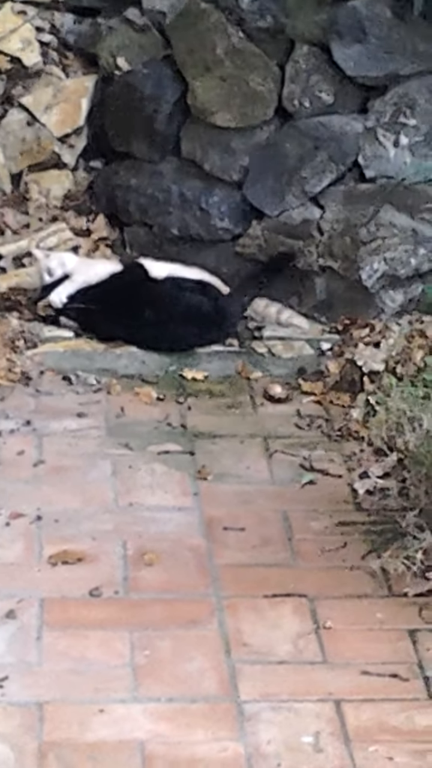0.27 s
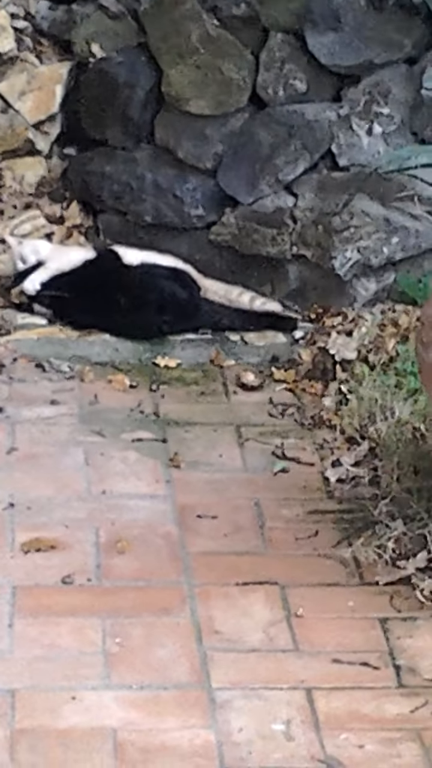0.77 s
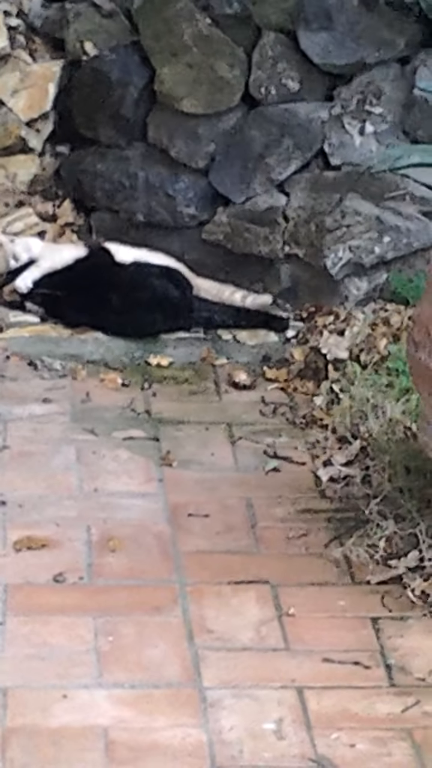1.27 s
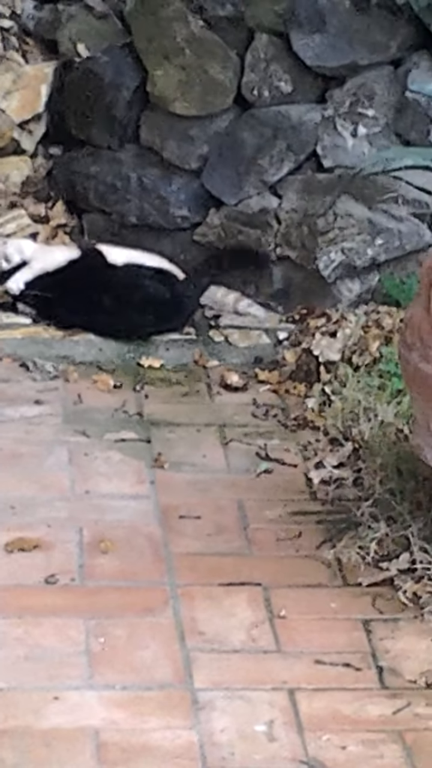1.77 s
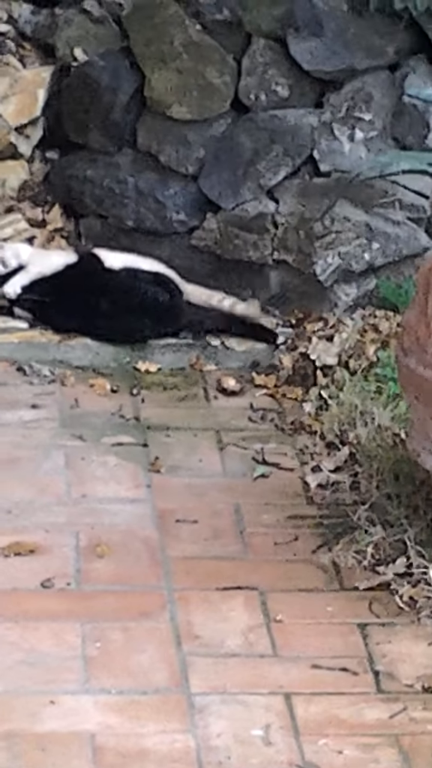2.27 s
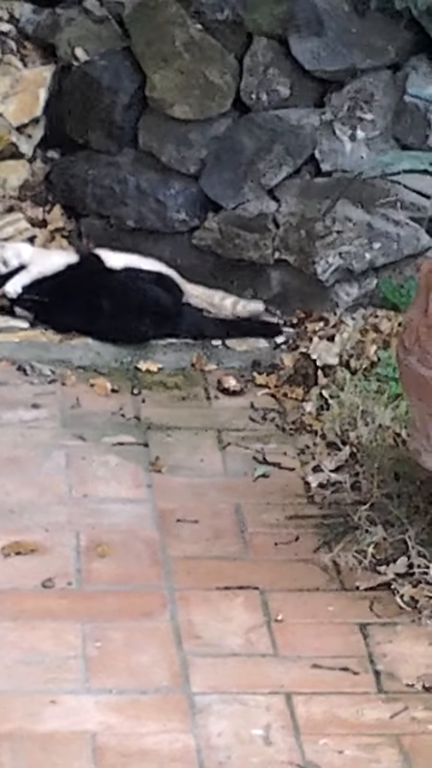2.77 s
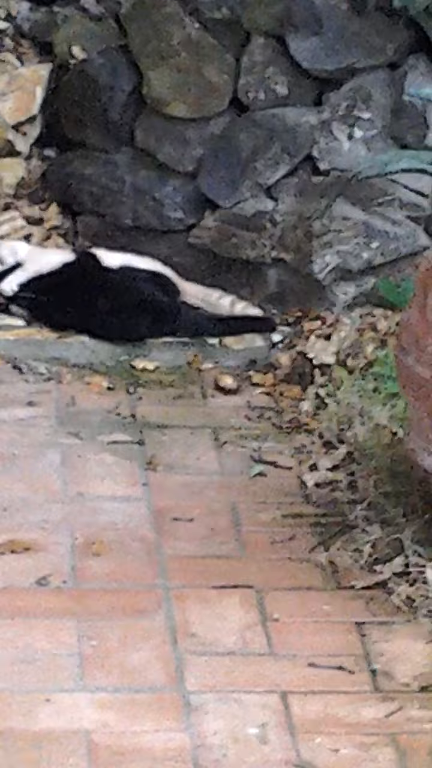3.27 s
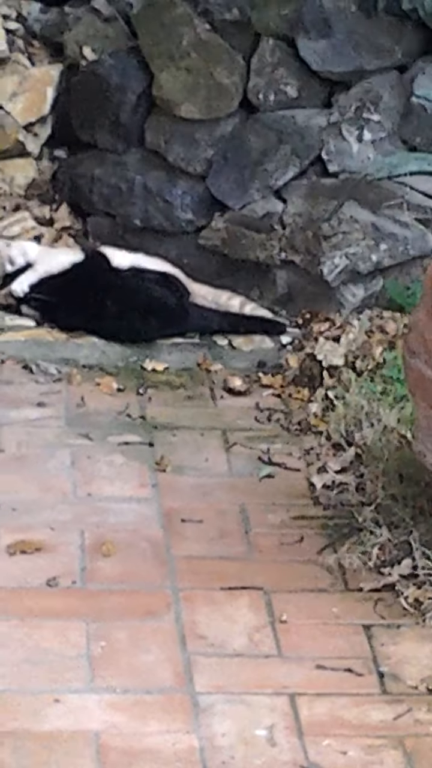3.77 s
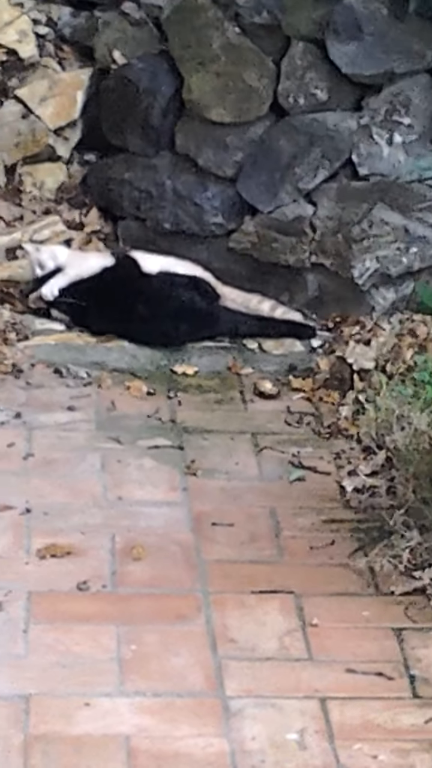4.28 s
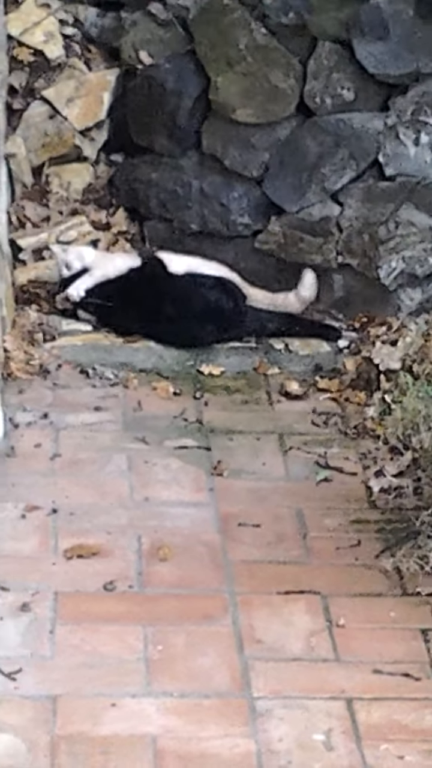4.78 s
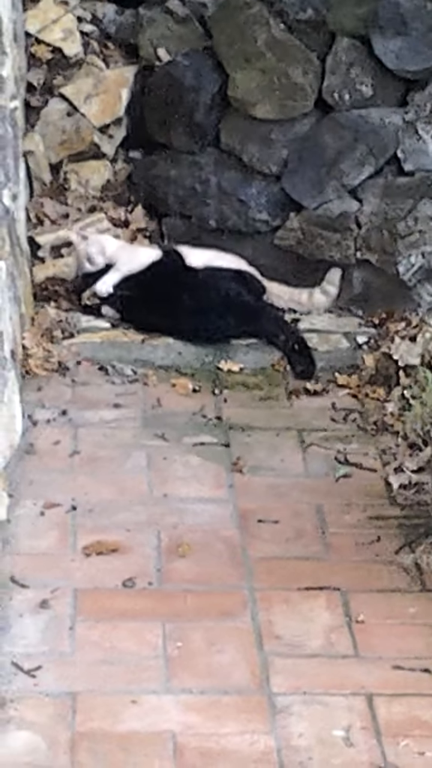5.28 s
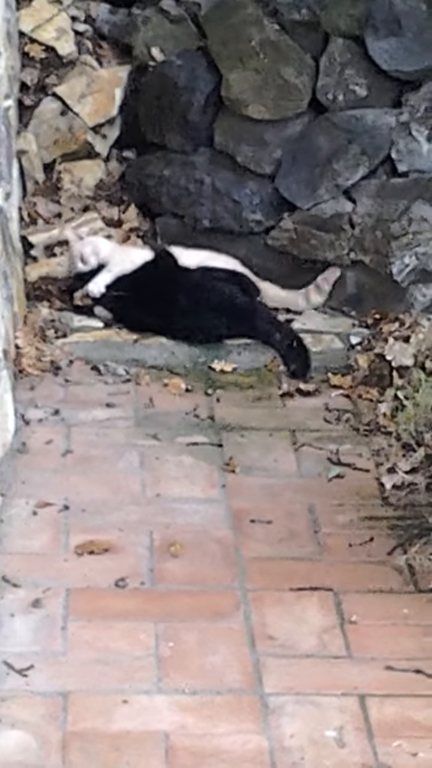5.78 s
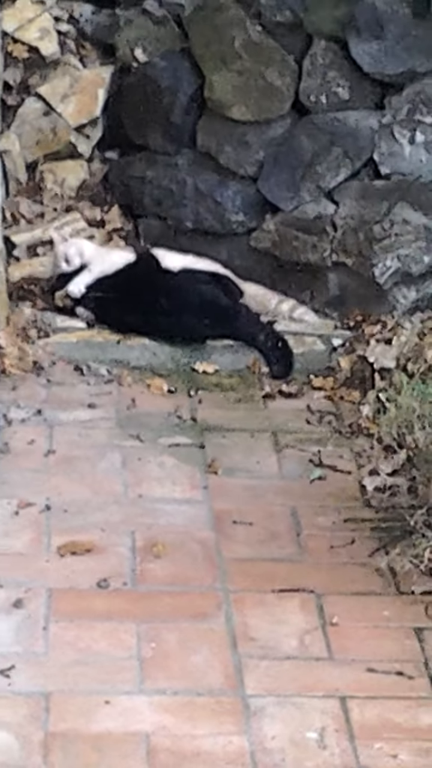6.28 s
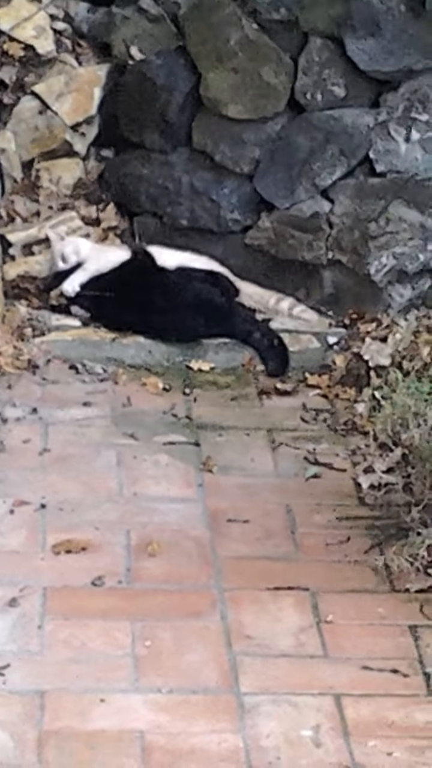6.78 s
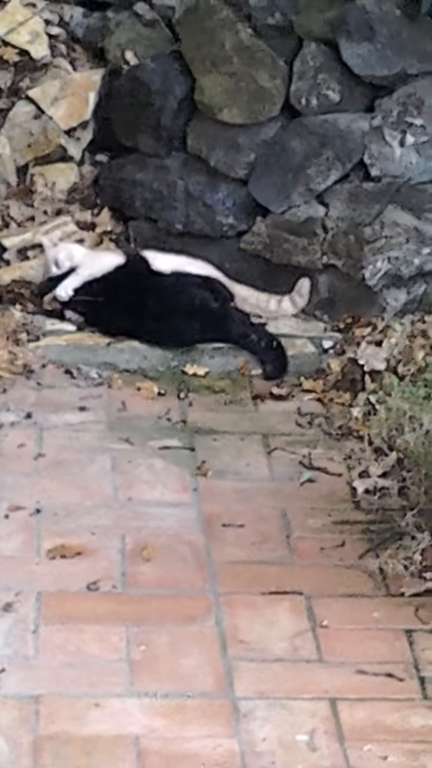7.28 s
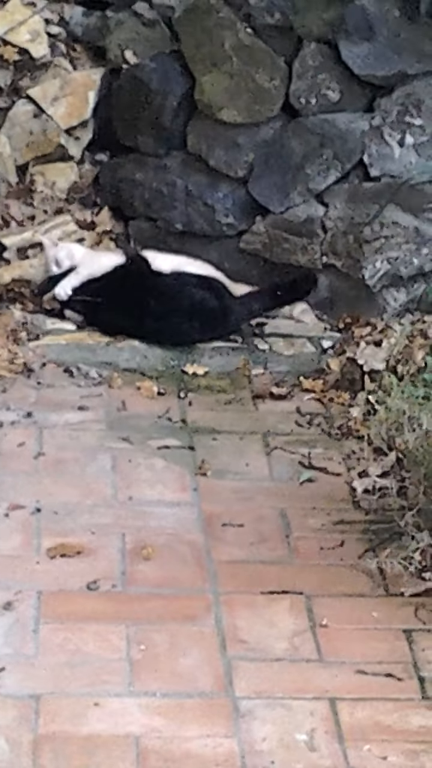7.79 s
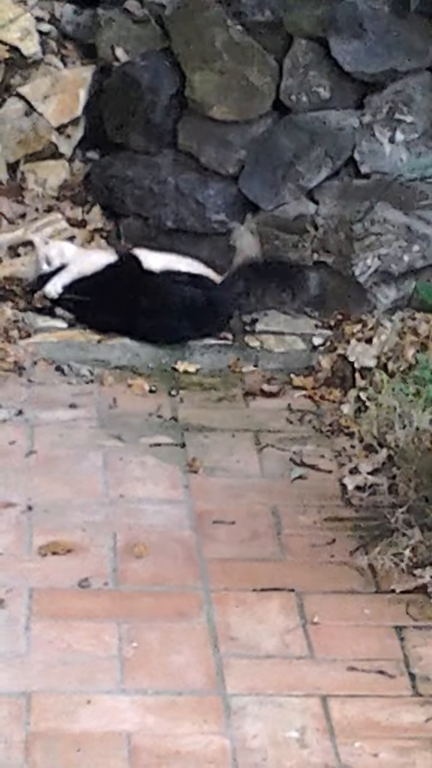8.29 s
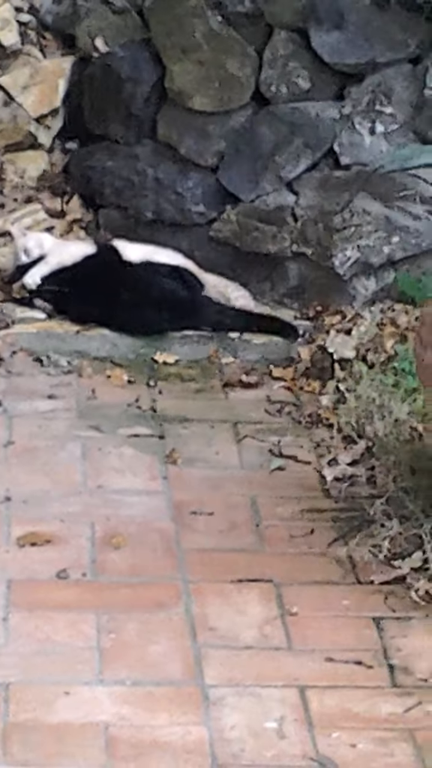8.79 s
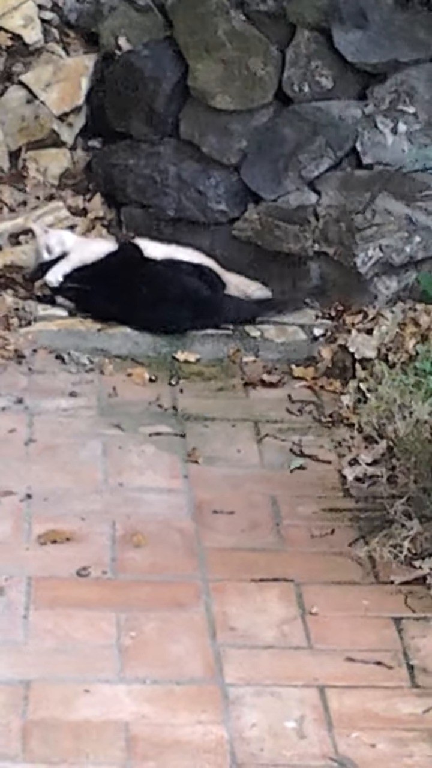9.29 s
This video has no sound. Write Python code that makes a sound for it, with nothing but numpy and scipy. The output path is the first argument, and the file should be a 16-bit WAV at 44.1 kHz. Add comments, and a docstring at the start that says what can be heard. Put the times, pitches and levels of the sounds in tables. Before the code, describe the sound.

A handheld microphone in a paved garden picks up faint hiss and dull wind bumps. Two cats start yowling together: a wavering arch against a steady nasal moan. The moan fades, another wail rises, then a sudden snarl leaps into a shrill, splitting scream that slides down. A quiet gap follows, then one long, loud wail droops into a low, rough moan, overlapped by booming wind thuds, and calm hiss closes.

```python
"""Wind buffets the microphone over a faint outdoor hiss, and then two tomcats yowl at the foot of a stone wall.
One wails in three long arches; the other holds a level moan, snarls, and breaks into a scream that splits and rasps.
Each voice is a sum of gliding fold harmonics weighted by the throat's resonances; turbulent air joins the scream.
Wall and paving return the voices as sparse echoes. Leaves, a scuff, wind and hiss are shaped noise;
each buffet adds a short decaying oscillation."""
import sys
import numpy as np
from scipy import signal
from scipy.fft import rfft, irfft, next_fast_len
from scipy.io import wavfile

SR = 44100
rng = np.random.default_rng(int(sys.argv[2]) if len(sys.argv) > 2 else 0)


def bounce(signal):
    """Save signal as a 16-bit WAV file at the path given by the first command-line argument."""
    frames = np.transpose(np.atleast_2d(signal))
    limited = np.clip(frames, -1, 1)
    pcm = np.round(limited * 32767).astype(np.int16)
    wavfile.write(sys.argv[1], SR, pcm)


N = 420909
TIME = np.arange(N) / SR  # seconds

# Contours of the yowls, before the throat and its resonances act.
# Each row: time in seconds, pitch in Hz, effort in dB, mouth opening in dB of resonance lift.
FIRST_WAIL = [(1.26, 208.6, -69, -3), (1.42, 346, -54, -1), (1.6, 464.6, -45, 1.5),
              (1.68, 485.3, -45.5, 6.5), (1.93, 495, -45, 10), (2.12, 460.7, -44, -1.5),
              (2.49, 381, -52.5, 6), (2.59, 388.7, -50, 4.5), (2.71, 351, -55, 0), (2.8, 281, -63, 6),
              (3.12, 272.6, -60, 7), (3.29, 189.5, -86, -10)]
SECOND_WAIL = [(3.97, 256, -63, -1), (4.04, 367, -52.5, 9.5), (4.152, 455, -44, 6), (4.24, 462, -45, 9.5),
               (4.351, 481.6, -43, 8.5), (4.521, 485.6, -43, 6), (4.65, 472, -46, 15),
               (4.768, 452.5, -42.5, -3.5), (4.9, 392.7, -50, 3), (5.0, 345, -52, -1.5)]
LAST_WAIL = [(6.74, 274, -50.5, 2), (6.81, 426, -41.5, 1.5), (6.9, 528.5, -38.5, 10),
             (6.98, 561.7, -33.5, 5.5), (7.12, 569.5, -35.5, 7), (7.23, 555.3, -38, 9.5),
             (7.35, 529.3, -46, 17.5), (7.46, 505.7, -41, 5), (7.53, 467.3, -37.5, -1.5),
             (7.62, 444, -39.5, -4.5), (7.79, 389.4, -46.5, 0.5), (8.08, 357, -47.5, -4),
             (8.3, 313, -50, -3), (8.55, 328.8, -50.5, -2), (8.73, 325.8, -52, 1.5), (8.97, 288, -53.5, 0),
             (9.05, 268, -63.5, -4)]
MOAN = [(1.3, 245.6, -55, -16), (1.41, 357.2, -48, -1), (1.56, 414, -34.5, 5), (1.75, 426.4, -35, 8),
        (1.95, 424.7, -34.5, 6.5), (2.12, 418.6, -31.5, 8), (2.19, 427.2, -34, 8.5),
        (2.65, 421.8, -33.5, 8), (2.86, 423.6, -36, 8), (3.14, 416.3, -33.5, 2), (3.38, 409.6, -38, 9),
        (3.58, 377, -44, 4), (3.62, 348, -51, 7)]
SCREAM = [(5.08, 691, -34.5, -30), (5.126, 723, -41.5, -22), (5.143, 820, -43, -4), (5.181, 961, -24.5, -9),
          (5.238, 1026, -14, -23.5), (5.288, 1004, -31.5, 9.5), (5.315, 987, -22, 3),
          (5.334, 911.6, -26, 3.5), (5.382, 920.5, -26, 3.5), (5.414, 886, -29.5, 3.5), (5.47, 991, -26, 5),
          (5.488, 1079, -23, 2.5), (5.522, 1099, -24, 10.5), (5.6, 1001, -23.5, 7.5),
          (5.689, 930, -23.5, 8.5), (5.741, 858, -30.5, 9), (5.871, 797.7, -26, 4.5), (5.999, 721, -28, 6),
          (6.09, 652, -28.5, -5), (6.134, 550, -38, -5), (6.17, 402, -65, 10)]
SNARL = [(4.965, 339, -62.5, 9.5), (5.03, 429, -44.5, 4), (5.068, 650, -43, 11.5), (5.09, 654, -61, -3)]

# Transfer of the throat for each voice. Each row: frequency in Hz, gain in dB.
WAIL_THROAT = [(250, -7.5), (420, -11), (620, -3.5), (1050, -4.5), (1280, -17.5), (1480, -13.5),
               (1950, -28.5), (2350, -23), (2950, -30), (3900, -42.5), (5000, -40.5), (6200, -36),
               (7300, -63), (11000, -56)]
LAST_WAIL_THROAT = [(250,-10), (420,-16.5), (620,-9), (1120,-5), (1650,-17), (1850,-22), (2080,-39),
                    (2300,-22), (2800,-34.5), (3350,-33), (3950,-34.5), (5100,-47), (6200,-40), (7300,-70),
                    (11000,-65)]
MOAN_THROAT = [(300, -21), (420, -14.5), (830, -5), (1150, -15), (1290, -38.5), (1700, -34.5),
               (2100, -33.5), (2500, -49), (3400, -53.5), (4200, -51.5), (5100, -49.5), (7500, -78)]
SCREAM_THROAT = [(450,-24), (750,-9), (1080,-5.5), (1300,-9.5), (1600,-11.5), (2000,-16), (2350,-25),
                 (3150,-21), (4500,-40.5), (5850,-34), (6700,-67), (7700,-52.5), (10500,-80.5),
                 (13800,-67.5), (15200,-88.5)]

# Vocal folds of each voice. The single row: pitch in Hz below which slack roughness sets in,
# brightness there in dB per octave, brightness gained per octave of pitch in dB per octave.
WAIL_FOLDS = (444, 0, 7.8)
LAST_WAIL_FOLDS = (433, -2.23, 5.5)
MOAN_FOLDS = (425, 1.18, 8.2)
SNARL_FOLDS = (700, 0, 3.1)
SCREAM_FOLDS = (900, -0.37, 1)

# Breaks of the forced voice. Each row: middle in seconds, half length in seconds, added roughness (0-1),
# alternation of strong and weak cycles (0-1), air level in dB.
BREAKS = [(5.064, 0.021, 0.3, 0, -67.5), (5.284, 0.018, 0.09, 0.15, -68), (5.333, 0.004, .03, 0.23, -61),
          (5.39, 0.082, 0.08, 0.62, -65), (5.448, 0.022, 0.22, 0.5, -49), (5.53, 0.054, 0.09, 0, -56.5),
          (5.626, 0.066, 0.19, 0.3, -45.5)]
# Wide gapes of the jaws, shared by every voice sounding then.
# Each row: middle in seconds, half length in seconds, lift of the upper throat resonance in dB.
GAPES = [(1.649, 0.079, 1.5), (5.262, 0.036, 4.5), (5.375, 0.06, 6), (5.804, 0.14, 8), (7.85, 0.15, 2.5)]
# Relative spectrum of the air forced through the screaming throat. Each row: frequency in Hz, density in dB per Hz.
AIR_COLOUR = [(300,-44), (700,-20.5), (1100,2), (1800,1), (2500,0.5), (3200,-11), (4200,3), (5600,-9),
              (6800,-20.5), (7700,-15), (10500,-41), (13500,-25), (15500,-51)]

# Reflections from paving and stones near each cat's head. Each row: delay in ms, amplitude gain.
WAILER_ECHOES = [(2.64, 0.091), (2.84, 0.11), (4.51, 0.17), (7.33, 0.08), (7.46, 0.24), (7.95, 0.089),
                 (8.62, 0.082), (16.46, 0.053)]
SCREAMER_ECHOES = [(2.14, 0.066), (3.5, 0.037), (3.79, 0.066), (4.42, 0.18), (4.68, 0.09), (5.38, 0.12),
                   (6.74, 0.05), (8.61, 0.11), (22.7, 0.23)]

# Single wind buffets. Each row: centre in seconds, level in dB, oscillation in Hz.
BUFFETS = [(.035,-35.5,152), (0.057,-36,134), (0.225,-35.5,117), (.518,-48,160), (6.702,-36,139.8),
           (7.065,-35,154), (7.152,-37,150), (7.51,-37,290), (7.725,-24.5,173.5), (8.11,-28.5,205.5),
           (8.438,-21.5,188.8), (9.35,-49,150)]
# Gusts at the microphone. Each row: peak in seconds, half width in seconds, level in dB.
GUSTS = [(.16, 0.17, -57), (1.63, 0.11, -68.5), (6.12, .06, -62), (6.599, 0.083, -58.5),
         (6.872, 0.01, -47.5), (7.2, 0.6, -61), (7.55, 0.038, -47), (7.73, .07, -41), (8.16, 0.093, -45),
         (8.36, 0.068, -44.5), (8.571, .015, -43.5), (8.791, 0.084, -52.5), (9.25, 0.2, -61)]
# Relative spectrum of the wind rumble. Each row: frequency in Hz, density in dB per Hz.
WIND_COLOUR = [(15,-18.5), (45,-5.5), (75,0), (130,4), (210,-1.5), (300,-13.5), (400,-18.5), (550,-35.5),
               (800,-37.5), (2000,-64.5), (6000,-89)]
# Dry leaves stirring. Each row: start in seconds, length in seconds, level in dB.
LEAVES = [(1.228, 0.046, -67.5), (2.404, 0.073, -71)]
# Relative spectrum of the outdoor hiss. Each row: frequency in Hz, density in dB per Hz.
HISS = [(18, -46), (30, -9.5), (59, -2.5), (88, -12), (178, -3.5), (263, -9), (308, -6), (421, -6.5),
        (640, -9.5), (1770, -16), (1920, -17), (3150, -18), (4790, -14), (6730, -25.5), (15600, -46)]
# Loudness of the outdoor hiss. Each row: time in seconds, level in dB.
HISS_LEVEL = [(0, -64.5), (2.5, -65.5), (3.7, -68), (9.54, -69)]

ROUGH_PER_OCTAVE, LEAST_ROUGH = 0.37, 0.018  # slack folds grow rough as the pitch sinks
ONSET_ROUGH, ONSET_S = 0.5, 0.16  # extra roughness per octave of slack at the start, and its decay time
BREAK_EDGE = 3.3  # exponent: steepness with which a break or a gape sets in and ends
SHRILL_HZ, SHRILL_OCTAVES = 3560, 0.31  # centre and width of the resonance lifted by a gape
GAPE_BRIGHT = 0.33  # dB per octave gained for each dB of gape lift
AIR_LEAK_DB = -38.5  # air that always escapes with the scream, relative to its effort
GUST_FALL_DB = 6.5  # slope far out on a gust's flanks, per half width
MICROPHONE_HISS_DB = -74
EDGE_HZ = 15700  # recorder's upper band limit


def screamer():
    """Source and filter: a level moan, its tone barely tied to the mouth, then a snarl that leaps into a scream."""
    moan = yowl(MOAN, MOAN_THROAT, MOAN_FOLDS, count=16, mouth_bright=0.017, waver=0.00104)
    snarl = yowl(SNARL, WAIL_THROAT, SNARL_FOLDS, count=8, jitter=0.07, quaver=0.066)
    scream = yowl(SCREAM, SCREAM_THROAT, SCREAM_FOLDS, count=19, mouth_bright=0.4, waver=0.0012,
                  jitter=0.022, rasp=0.099, rasp_hz=380, uneven_db=0.9, quaver=0.015)
    return moan + snarl + reflected(scream + throat_air(), SCREAMER_ECHOES)


def wailer():
    """Source and filter: three arching wails, the last with a throat colour of its own."""
    first = yowl(FIRST_WAIL, WAIL_THROAT, WAIL_FOLDS, mouth_bright=0.19, waver=0.0011)
    second = yowl(SECOND_WAIL, WAIL_THROAT, WAIL_FOLDS, mouth_bright=0.19, waver=0.0011)
    last = yowl(LAST_WAIL, LAST_WAIL_THROAT, LAST_WAIL_FOLDS,
                mouth_bright=0.4, waver=0.0022, jitter=0.036, quaver=0.056)
    return reflected(first + second + last, WAILER_ECHOES)


def yowl(rows, throat, folds, count=22, mouth_hz=1550, mouth_octaves=0.46, mouth_bright=0.56, waver=0.0028,
         jitter=0.069, rasp=0.27, rasp_hz=330, uneven_db=0.85, quaver=0.066):
    """Additive source and filter: fold harmonics glide through resonances; tense folds are bright, slack ones rough."""
    s, *columns = np.transpose(rows)
    t = np.arange(s[0], s[-1], 1 / SR)
    slow = np.linspace(s[0], s[-1], len(t) // 64)  # coarse time grid for the contours
    pitch, effort_db, mouth_db = (np.interp(slow, s, c) for c in columns)

    clean_hz, clean_bright_db, rise_db = folds
    tension = np.log2(pitch / clean_hz)  # octaves
    gape_db = sum(db * spell(slow, middle, half) for middle, half, db in GAPES)
    bright_db = clean_bright_db + rise_db * tension + mouth_bright * mouth_db + GAPE_BRIGHT * gape_db

    forced, split, _ = breaking(slow)
    onset = ONSET_ROUGH * np.exp((s[0] - slow) / ONSET_S)
    slack = np.maximum(-tension, 0) * (ROUGH_PER_OCTAVE + onset)
    rough = np.interp(t, slow, np.clip(LEAST_ROUGH + slack + forced, 0, 1))

    # the pitch trembles slightly; rough folds close early or late
    tremble = 1 + (waver + quaver * rough) * wander(29.9, len(t))
    turns = np.cumsum(np.interp(t, slow, pitch) * tremble) / SR
    turns += jitter * rough * wander(rasp_hz, len(t))

    voice = np.zeros(len(t))
    # alternating cycles put lines halfway between the harmonics
    step = 0.5 if split.max() > 0.1 else 1
    for k in np.arange(step, count, step):
        halfway = k % 1 > 0
        hz = k * pitch
        mouth = resonance(hz, mouth_hz, mouth_octaves)
        shrill = resonance(hz, SHRILL_HZ, SHRILL_OCTAVES)
        octaves = np.log2(np.minimum(hz, 4000) / 850)  # the brightness tilt pivots at 850 Hz
        line_db = effort_db + read(throat, hz) + mouth_db * mouth + gape_db * shrill + bright_db * octaves
        # upper harmonics and half lines are less steady than the low ones
        unsteady_db = uneven_db * (np.log2(max(k, 1)) + 2.1 * halfway)
        size = gain_of(line_db + unsteady_db * flicker(len(slow)))
        if halfway:
            size = size * split
        voice += np.interp(t, slow, size) * np.cos(2 * np.pi * (k * turns + rng.random()))

    # rough cycles also differ in strength
    voice *= 1 + rasp * rough * wander(rasp_hz, len(t))
    out = np.zeros(N)
    add(out, s[0], voice * signal.windows.tukey(len(t), 0.026 / (s[-1] - s[0])))  # 13 ms fades
    return out


def throat_air(grain_db=2, grain_hz=400):
    """Modulated turbulence: the opening folds pass air in uneven puffs, which surge where the voice breaks."""
    s, pitch, effort_db, _ = np.transpose(SCREAM)
    opening = 1 + np.cos(2 * np.pi * np.cumsum(np.interp(TIME, s, pitch)) / SR)
    puffs = evened(opening * gain_of(grain_db * wander(grain_hz, N)))
    leak_db = np.interp(TIME, s, effort_db, left=-140, right=-140) + AIR_LEAK_DB
    level = gain_of(leak_db) + breaking(TIME)[2]
    return level * evened(coloured(puffs * rng.standard_normal(N), AIR_COLOUR)[:N])


def breaking(t):
    """Irregular fold motion: roughness, cycle alternation and air amplitude of the breaks at times t."""
    return sum(np.outer((rough, split, gain_of(air_db)), spell(t, s, half))
               for s, half, rough, split, air_db in BREAKS)


def spell(t, s, half):
    """A flat-topped pulse: rises to 1 around time s, holds, and falls again."""
    return np.exp(-np.minimum(abs(t - s) / half, 10) ** BREAK_EDGE)


def resonance(hz, centre_hz, width_octaves):
    """A resonance peak of height 1, bell-shaped on a log-frequency axis."""
    return np.exp(-(np.log2(hz / centre_hz) / width_octaves) ** 2)


def flicker(count, size=17):
    """Smoothed random fluctuation of rms 1."""
    return evened(signal.convolve(rng.standard_normal(count), np.hanning(size), "same"))


def reflected(x, echoes):
    """Superposition of the direct sound and its delayed first reflections."""
    return x + sum(gain * np.interp(TIME - ms / 1000, TIME, x) for ms, gain in echoes)


def garden(x, t60=0.31, first_s=0.008):
    """Sparse reverberation: walls scatter decaying echoes, against which the gliding harmonics beat."""
    wet_db, echoes_per_s = -13, 2000
    t = np.arange(SR // 2) / SR
    hits = (rng.random(len(t)) < echoes_per_s / SR) * (t > first_s)
    taps = rng.standard_normal(len(t)) * hits * gain_of(-60 * t / t60)
    return x + gain_of(wet_db) * signal.fftconvolve(x, taps / np.linalg.norm(taps))[:N]


def buffets(cycles=0.49, slap_db=-14, slap_s=0.0059):
    """Transient pressure: a sharp eddy shoves the microphone in a short oscillation with a dull slap."""
    out = np.zeros(N)
    t = np.arange(-SR // 40, SR // 40) / SR
    slap_colour = [(100, 7.5), (330, -1.5), (650, -8), (1000, -29), (3000, -55)]  # Hz, dB
    for s, db, hz in BUFFETS:
        swell = np.exp(-np.hypot(t * hz, 0.1) / cycles)
        shove = swell * np.sin(-2 * np.pi * hz * t)
        slap = np.exp(-abs(t) / slap_s) * noise(slap_colour, len(t))
        add(out, s + t[0], gain_of(db) * (shove + gain_of(slap_db) * slap))
    return out


def wind(lumpy_db=3, eddies_hz=22, flutter_db=-14, strong_db=-42):
    """Turbulent pressure: eddies rumble on the microphone; strong ones reach higher in pitch."""
    gusts_db = [db - GUST_FALL_DB * (np.hypot((TIME - s) / half, 1) - 1) for s, half, db in GUSTS]
    level_db = np.max(gusts_db, axis=0)
    lumps = evened(gain_of(lumpy_db * wander(eddies_hz, N)))
    push = gain_of(level_db - strong_db) * lumps
    rumble = noise(WIND_COLOUR, N)
    flutter = noise([(100, -47), (280, 9), (500, -4), (1000, -38), (4000, -54)], N)
    # the flutter grows faster than the rumble as the push rises
    return gain_of(strong_db) * push * (rumble + gain_of(flutter_db) * np.sqrt(push) * flutter)


def leaves():
    """Irregular friction: dry leaves beside the cats give brief crinkles of grainy noise."""
    out = np.zeros(N)
    for s, length, db in LEAVES:
        size = int(length * SR)
        grains = gain_of(3.7 * wander(300, size))
        crinkle = noise([(800, -32), (3500, 9), (5500, 5), (8000, -30)], size) * grains
        add(out, s, gain_of(db) * evened(crinkle * np.hanning(size)))
    return out


def scuff(s=0.33, length=0.15, db=-62):
    """Friction noise: a soft, dull scuff near the microphone."""
    out, size = np.zeros(N), int(length * SR)
    rub = noise([(120, -25), (260, -1), (400, 5), (600, -15), (1500, -46)], size)
    add(out, s, gain_of(db) * evened(rub * np.hanning(size)))
    return out


def hiss():
    """Stationary noise: a distant outdoor wash over the microphone's own even hiss."""
    outdoors = gain_of(np.interp(TIME, *np.transpose(HISS_LEVEL))) * noise(HISS, N)
    return outdoors + gain_of(MICROPHONE_HISS_DB) * rng.standard_normal(N)


def gain_of(db):
    """The decibel law: level to amplitude."""
    return 10 ** (np.asarray(db) / 20)


def evened(x):
    """Normalisation to rms 1."""
    return x / np.sqrt(np.mean(x ** 2) + 1e-20)


def read(points, hz):
    """Interpolation of a spectrum in dB on a log-frequency axis."""
    f, db = np.transpose(points)
    return np.interp(np.log(hz + 1), np.log(f + 1), db)


def add(mix, s, sound):
    """Superposition: adds a sound to the mix at time s."""
    part = mix[max(round(s * SR), 0):][:len(sound)]
    part += sound[:len(part)]


def coloured(x, colour):
    """Linear filtering by a spectrum; the result is padded to a fast transform length."""
    padded = next_fast_len(len(x))
    shape = gain_of(read(colour, np.fft.rfftfreq(padded, 1 / SR)))
    return irfft(rfft(x, padded) * shape, padded)


def noise(colour, size):
    """Filtered white noise of rms 1 with a given spectrum."""
    white = rng.standard_normal(next_fast_len(size))
    return evened(coloured(white, colour)[:size])


def wander(hz, size):
    """Low-passed random motion of rms 1, slower than hz."""
    lowpass = signal.butter(4, hz, fs=SR, output="sos")
    return evened(signal.sosfilt(lowpass, rng.standard_normal(size)))


def scene():
    """Superposition of both cats in the garden with leaves, scuff, hiss and wind."""
    cats = garden(wailer() + screamer())
    surroundings = leaves() + scuff() + hiss() + wind() + buffets()
    return (cats + surroundings)[None]


def record(dry):
    """Band limitation: the recorder passes only what lies below its upper edge."""
    lowpass = signal.firwin(511, EDGE_HZ, window=("kaiser", 9), fs=SR)
    return signal.oaconvolve(dry, lowpass[None], "same")


dry = scene()
out = record(dry)
bounce(out)
```